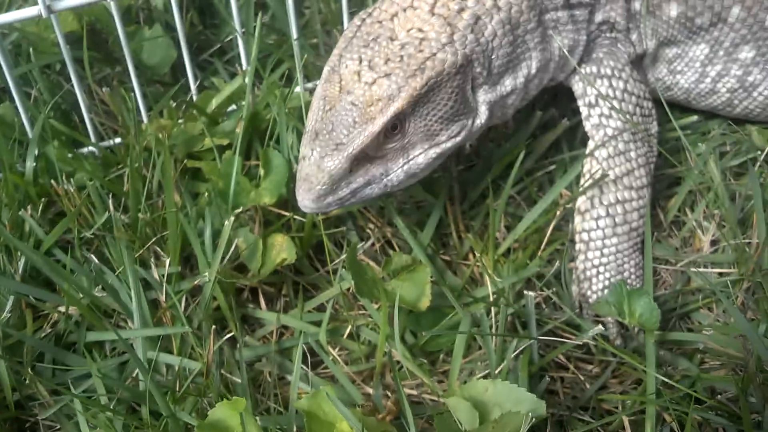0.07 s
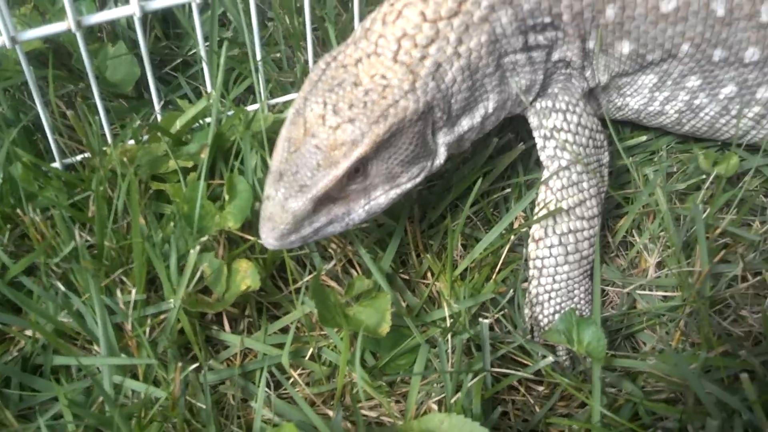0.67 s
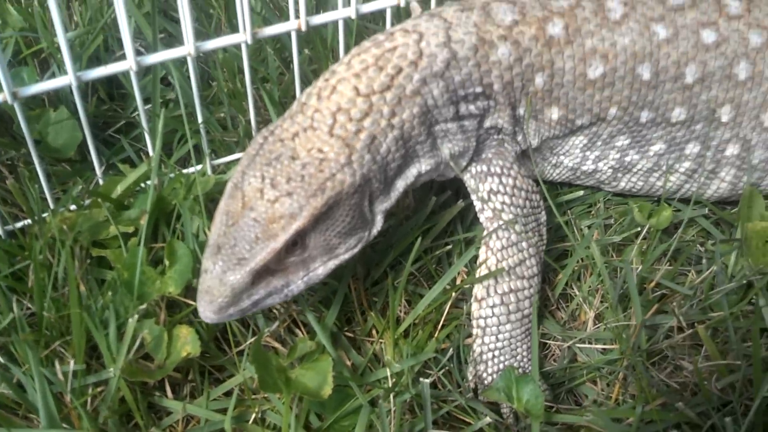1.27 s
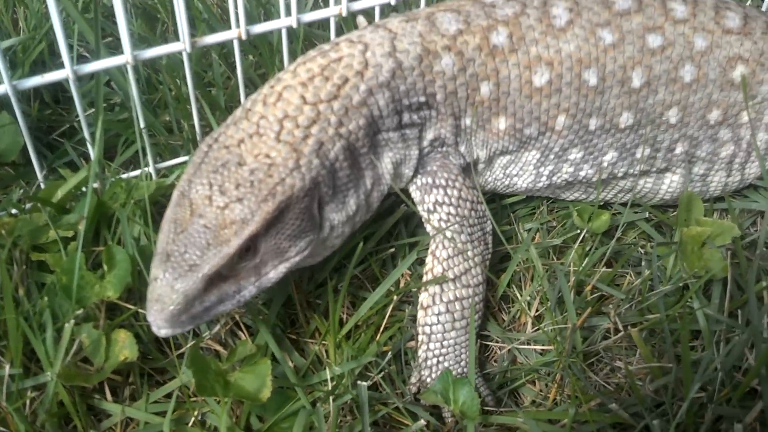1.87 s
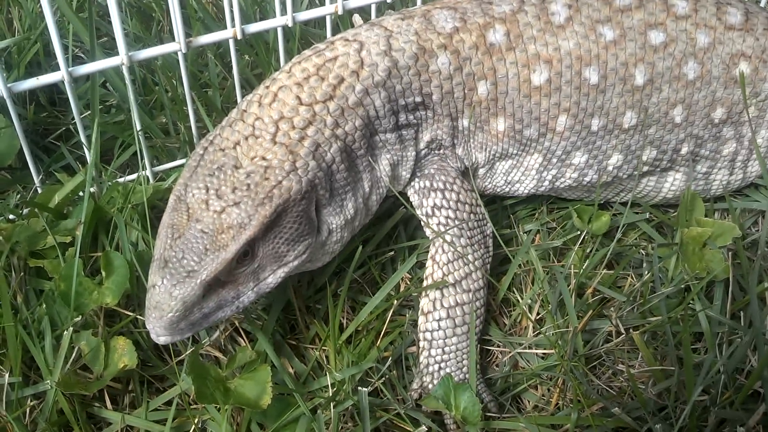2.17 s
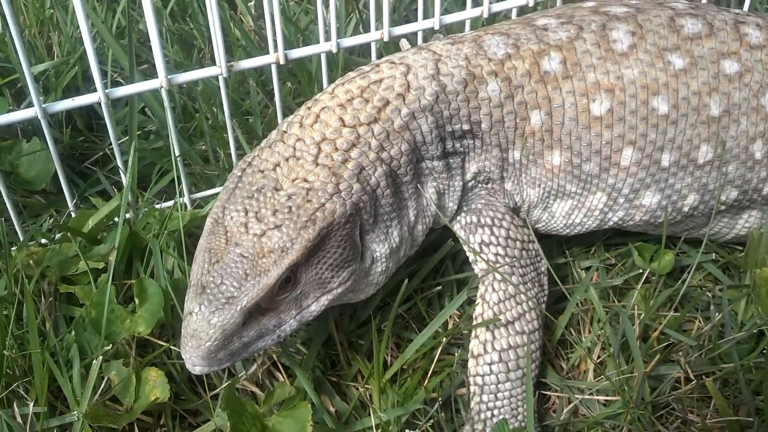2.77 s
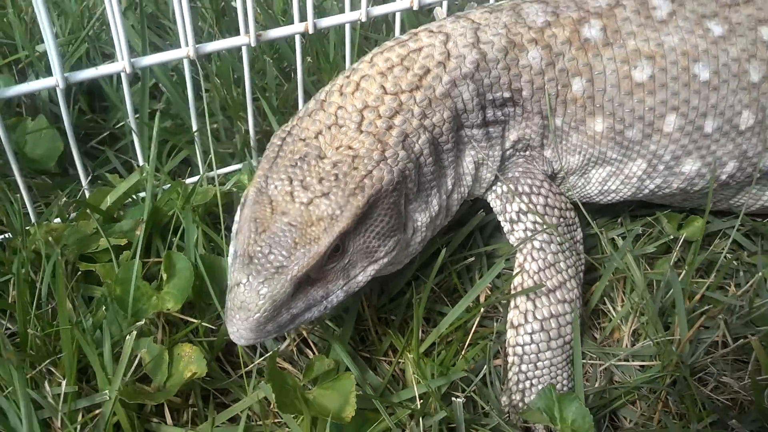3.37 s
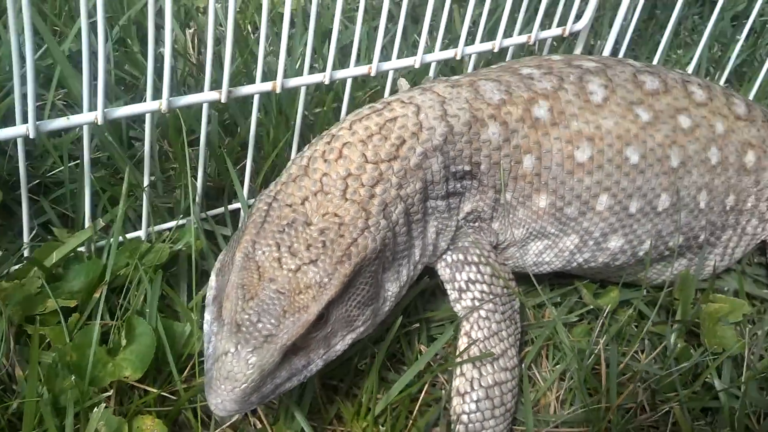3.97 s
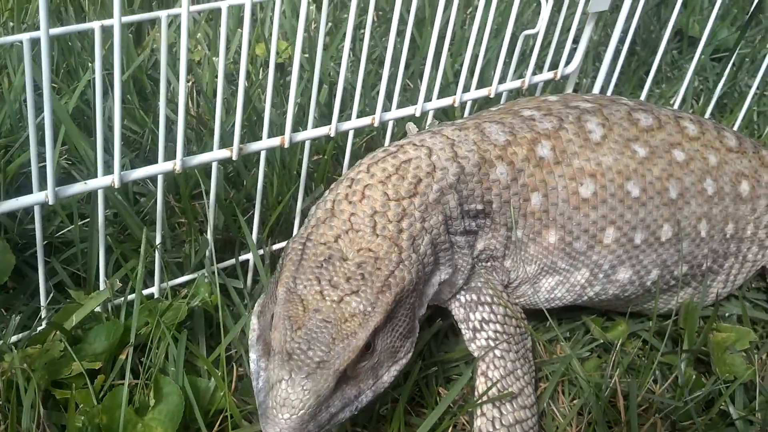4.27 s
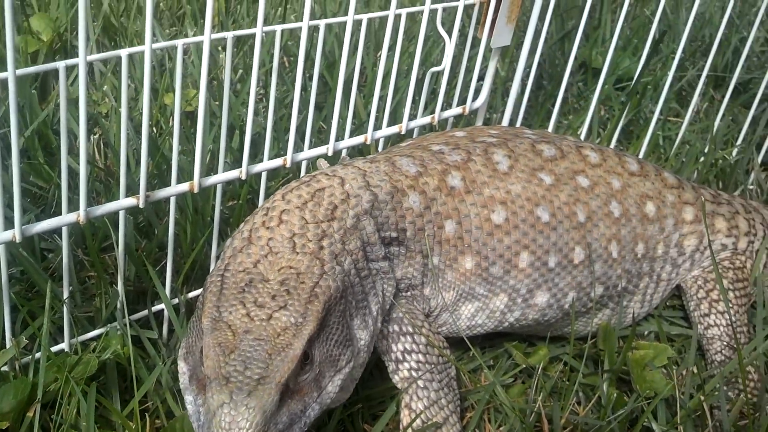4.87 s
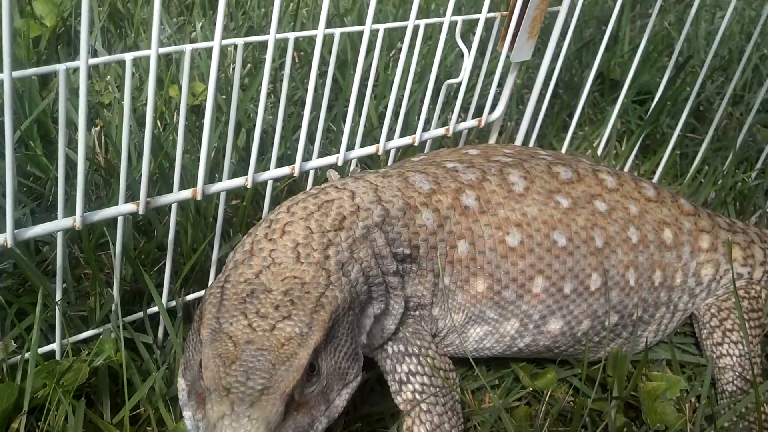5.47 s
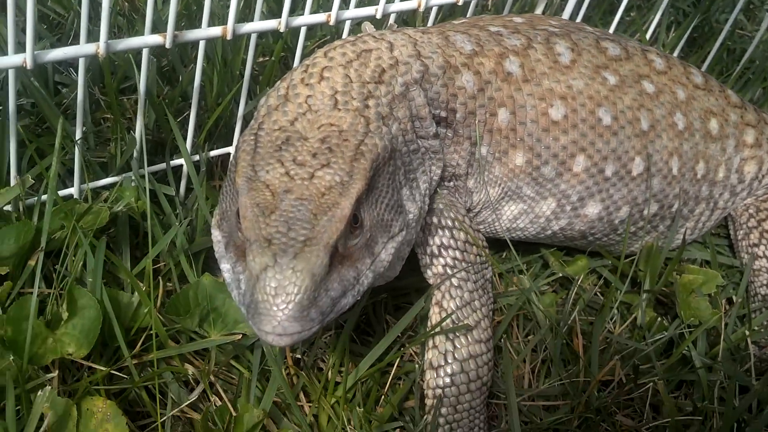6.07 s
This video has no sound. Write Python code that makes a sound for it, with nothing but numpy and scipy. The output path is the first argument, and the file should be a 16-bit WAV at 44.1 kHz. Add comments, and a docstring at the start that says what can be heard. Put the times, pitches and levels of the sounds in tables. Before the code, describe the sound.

On a lawn with a soft outdoor rumble and faint, shrill insects, a nearby lizard exhales a single throaty hiss that dies away. Fingers rub and knock on the handheld camera, with one loud, sharp click that briefly lowers everything else. Then a distant engine rises to a steady low drone while a cricket chirps evenly and another insect starts a pulsing rasp. Light handling knocks and tiny squeaks come close to the microphone.

```python
"""On a lawn, insects sing all round and a far engine picks up speed. A monitor lizard pushes out one long
hiss through its throat and mouth, fading as its lungs empty. Fingers scuff, squeak and knock on the
camera, and one sharp click makes its gain control (automatic volume) duck and creep back. The camera
widens its stereo picture by cross-feeding its two microphone ports, the openings that let sound in."""
import sys
import numpy as np
from scipy import signal
from scipy.fft import rfft, irfft, next_fast_len
from scipy.io import wavfile
from scipy.ndimage import uniform_filter1d, map_coordinates

SR = 44100
rng = np.random.default_rng(int(sys.argv[2]) if len(sys.argv) > 2 else 0)


def store_wav(level_fs):
    """Save 16-bit WAV to argv[1]."""
    pcm = np.round(np.clip(np.atleast_2d(level_fs), -1, 1) * 32767)
    wavfile.write(sys.argv[1], SR, pcm.T.astype(np.int16))


N = 269451


def amp(db):
    """Turn decibels into a number to multiply by."""
    return 10 ** (np.asarray(db) / 20)


def unit(x):
    """Scale x to an average strength (rms) of 1."""
    return x / np.sqrt(np.mean(x ** 2) + 1e-20)


def clock():
    """The time of every sample, in seconds."""
    return np.arange(N) / SR


def curves(rows):
    """Join rows of (time, values...) with straight lines: one curve for each value column."""
    times, *columns = np.transpose(rows)
    return [np.interp(clock(), times, column) for column in columns]


def wobble(rate):
    """A smooth curve through `rate` random values a second."""
    return map_coordinates(rng.standard_normal(int(N * rate / SR) + 4), [clock() * rate])


def filtered(x, response):
    """Multiply each frequency in x by response(hz)."""
    n = x.shape[-1]
    padded = next_fast_len(n + 4096)
    return irfft(rfft(x, padded) * response(np.fft.rfftfreq(padded, 1 / SR)), padded)[..., :n]


def colour(points):
    """A filter response drawn through points of f/Hz, level/dB."""
    freqs, db = np.transpose(points)
    return lambda hz: amp(np.interp(np.log(hz + 1), np.log(freqs), db))


def bell(centre_hz, width_hz):
    """A filter response that favours one pitch and falls away on both sides."""
    return lambda hz: 1 / (1 + ((hz - centre_hz) / width_hz) ** 2 * 2)


def panned(x, pan_db):
    """x at the two ports, the left one pan_db louder."""
    return x * amp([[pan_db / 2], [-pan_db / 2]])


def rush(response, side_db, pan_db):
    """Filtered stereo noise of strength 1; side_db sets the part that the ports do not share."""
    mid, side = filtered(rng.standard_normal((2, N)), response)
    side = side * amp(side_db)
    return unit(panned(np.array([mid + side, mid - side]), pan_db))


def swell(middle_s, length_s):
    """A smooth rise and fall of height 1."""
    return np.exp(-2 * np.minimum(((clock() - middle_s) / length_s) ** 2, 20))


def add(track, start_s, sound):
    """Mix a stereo sound into the track at start_s."""
    part = track[:, round(start_s * SR):][:, :sound.shape[1]]
    part += sound[:, :part.shape[1]]


def garden(chorus_db=-50):
    """Low outdoor rumble, airy hiss and the steady shrill of many insects."""
    # how loud the background is: t/s, rumble level/dB, air level/dB
    levels = [(0, -46, -49.5), (2.2, -51, -48.5), (3.1, -49.5, -47), (4.2, -49, -48.5), (6.11, -50, -51)]
    # tone of the rumble and of the airy hiss: f/Hz, level/dB
    rumble_tone = [(25, -67), (60, -24), (90, -7.5), (150, 2.5), (205, -4), (238, -1), (275, -5),
                   (330, -7.5), (550, -9.5), (900, -15.5), (1500, -23), (2500, -42)]
    air_tone = [(500, -8), (1500, 3), (2500, -0.5), (3500, -0.5), (4400, 5), (5100, -6.5), (7200, 8),
                (8000, 1.5), (9500, 2), (11000, -11), (13500, -5.5), (15800, -6)]
    # pitches that the crowd of insects sings on: f/Hz, width/Hz, level/dB
    chorus_bands = [(4380, 900, -6), (5830, 120, -1), (6240, 140, -2.5), (6804, 106, 1.5), (7100, 40, 4)]
    rumble_db, air_db = curves(levels)
    rumble = amp(rumble_db + wobble(5.9)) * rush(colour(rumble_tone), side_db=-2, pan_db=-4)
    air = amp(air_db + 0.36 * wobble(4.89)) * rush(colour(air_tone), side_db=2, pan_db=-0.5)
    shrill = lambda hz: sum(amp(db) * bell(centre, width)(hz) for centre, width, db in chorus_bands)
    chorus = amp(chorus_db + 0.15 * wobble(12)) * rush(shrill, side_db=1, pan_db=-6)
    return rumble + air + chorus


def hums(waver_db=2.0, waver_rad=0.88):
    """Two low hums waver in the distance."""
    # the faint hums: f/Hz, level/dB
    pitches = [(145.6, -64.5), (259, -66)]
    tone = np.zeros(N)
    for hz, db in pitches:
        strength = amp(db + waver_db * wobble(2.9))
        tone += strength * np.sin(2 * np.pi * hz * clock() + waver_rad * wobble(8))
    return panned(np.sqrt(2) * tone, pan_db=-5)


def engine(port_lag_rad=0.96, blur_rad=0.14, blur_rate=24, fade_db=1.2):
    """A far exhaust: each of its tones wavers on its way through the air; high ones blur to a drone."""
    # the engine picking up speed: t/s, firing rate/Hz, level/dB
    run = [(2.35, 89.4, -70), (2.62, 92.4, -60), (2.92, 97.7, -57.5), (3.05, 99.8, -46.5),
           (3.27, 107.1, -53.5), (3.41, 113.3, -46), (3.63, 116.2, -47), (3.77, 115.4, -45),
           (3.91, 109.3, -48), (4.03, 111.3, -44.7), (4.4, 114.6, -45.5), (4.65, 117.5, -48.5),
           (4.95, 117.4, -47.5), (5.19, 114.6, -44), (5.45, 115.9, -46.5), (5.75, 116.9, -49),
           (6.11, 115.3, -43.5)]
    # tones of the exhaust: multiple of the firing rate, level/dB
    exhaust = [(1, 0.5), (2, -24.5), (3, -19.5), (4, -17.5), (5, -20), (6, -26.5)]
    firing_hz, db = curves(run)
    phase = 2 * np.pi * np.cumsum(firing_hz * (1 + 0.004 * wobble(25))) / SR
    ports = np.array([[0], [port_lag_rad]])
    drone = np.zeros((2, N))
    for k, tone_db in exhaust:
        strength = amp(tone_db + min(k, 3) * fade_db * wobble(7))
        blur = (k - 1) * blur_rad * wobble(blur_rate)
        drone += strength * np.sin(k * phase + blur + ports)
    return panned(amp(db) * np.sqrt(2) * drone, pan_db=-6.5)


def beats(song):
    """The time and level of each call, repeating evenly within each stretch of a song."""
    ends = [s - period / 2 for s, period, db in song[1:]] + [N / SR]
    return [(s, db) for (first, period, db), end in zip(song, ends)
            for s in np.arange(first, end, period)]


def katydid(song, pitch_hz, far_db, pan_db, lisp_s=0.031, tooth_hz=126, fizz_db=-14, drift_hz=60):
    """Short high lisps over fainter far ones, buzzing as a row of wing teeth passes a scraper."""
    # overtones of a lisp: f/Hz, level/dB
    fizz_tone = [(5000, -36), (9000, 0), (11000, -38), (13500, 27), (15800, -8)]
    lisps = sum(amp(db) * swell(s, lisp_s) for s, db in beats(song))
    loudness = amp(far_db + 1.9 * wobble(19)) + amp(wobble(5)) * lisps
    pitch = pitch_hz + drift_hz * wobble(5.4)
    tooth_rate = tooth_hz * (1 + 0.0733 * wobble(12))
    teeth = 1 + 0.5 * np.sin(2 * np.pi * np.cumsum(tooth_rate) / SR)
    # low noise times a sine makes a narrow band of noise around the sine's pitch
    low_noise = rush(bell(0, width_hz=180), side_db=-0.5, pan_db=pan_db)
    wing = unit(low_noise * np.sin(2 * np.pi * np.cumsum(pitch) / SR))
    fizz = amp(fizz_db) * rush(colour(fizz_tone), side_db=-29, pan_db=-29)
    return loudness * unit(teeth) * (wing + fizz)


def katydids():
    """Two katydids (bush crickets) sing out of step, each on its own pitch."""
    # stretches of each song: first lisp t/s, time between lisps/s, level/dB
    high_song = [(0.11, 0.19, -58.5), (1.7, 0.19, -58), (3.04, 0.2137, -59.5), (4.73, 0.23, -59)]
    low_song = [(2.42, 0.16, -55), (3.03, 0.247, -61.5), (4.52, 0.24, -60)]
    return (katydid(high_song, pitch_hz=10090, far_db=-70.5, pan_db=-10.5)
            + katydid(low_song, pitch_hz=9980, far_db=-67.5, pan_db=-2))


def cricket(pitch_hz=4490, drift_hz=20, sag_hz_per_s=9000, period_s=0.0406, stroke_s=0.0138,
            rough_db=2, scratch_rad=1.17, stray_s=0.0044, stray_db=0.8):
    """A chirp is three scratchy wing strokes that tend to grow; each drops in pitch as the wing slows."""
    # the chirps: middle t/s, level/dB
    chirps = [(0.13, -51), (0.47, -56), (0.79, -50), (1.13, -49), (1.469, -53), (1.865, -52), (2.22, -49.5),
              (2.58, -46.5), (2.97, -50), (3.4, -50), (3.83, -49.5), (4.19, -48.5), (4.529, -46),
              (4.9, -49), (5.25, -47.5), (5.58, -46.5), (5.912, -49)]
    strokes = np.zeros(N)
    hz = pitch_hz + drift_hz * wobble(2.3)
    for s, db in chirps:
        for k, step_db in enumerate([-1.5, -0.3, 0.3]):
            early, strength = rng.standard_normal(2)
            middle = s + (k - 1) * period_s - stray_s * early
            strokes += amp(db + step_db + stray_db * strength) * swell(middle, stroke_s)
            since = clock() - middle
            hz -= sag_hz_per_s * since * (np.abs(since) < period_s / 2)
    scratch = scratch_rad * np.array([wobble(420), wobble(420)])
    wing = panned(np.sin(2 * np.pi * np.cumsum(hz) / SR + scratch), pan_db=-4)
    return strokes * unit(amp(rough_db * wobble(250)) * wing)


def rasping_insect(level_db=-47.5, half_up_s=3.98, rise_s=0.5, stroke_hz=10, stroke_s=0.005, buzz=0.7):
    """An insect works up to a rasp of short strokes of uneven strength over a steadier buzz."""
    # tone of the rasp: f/Hz, level/dB
    rasp_tone = [(2500, -27), (3400, 3.5), (4000, -5), (5000, 1), (5800, 4), (7000, -6.5), (8500, -36),
                 (12000, -46)]
    effort = (1 + np.tanh((clock() - half_up_s) / rise_s / 2)) / 2
    cycles = clock() * stroke_hz + 0.21 * wobble(5.2)  # slightly uneven timing
    from_stroke_s = np.abs(cycles % 1 - 0.5) / stroke_hz
    strokes = buzz + amp(2.5 * wobble(17)) * np.exp(-from_stroke_s / stroke_s)
    loudness = effort * amp(level_db + 0.23 * wobble(9))
    return loudness * unit(strokes) * rush(colour(rasp_tone), side_db=-1.5, pan_db=0.5)


def scuffs(grain_db=4, width_hz=170, catches_per_s=700):
    """Skin slips over the camera's case in tiny catches; each slide favours one pitch."""
    # finger slides: middle t/s, half length/s, level/dB, main f/Hz, share of broad noise
    slides = [(1.068, 0.13, -47.5, 1080, 0.27), (1.437, 0.037, -45.5, 1430, 0.35),
              (1.839, 0.048, -54.5, 1370, 0.15), (2.685, 0.083, -51.5, 1630, 0.8),
              (2.772, 0.065, -45, 1540, 1), (3.683, 0.35, -57, 925, 0.25), (3.96, 0.015, -40.5, 1547, 0.46),
              (3.99, 0.046, -50.5, 940, 0.35), (4.301, 0.21, -58.5, 1069, 0.29),
              (5.488, 0.094, -53, 1210, 0.11)]
    # tone of skin rubbing the case: f/Hz, level/dB
    rub_tone = [(40, -53), (200, 0), (500, 5), (1050, -5.5), (1500, -7.5), (2000, 1.5), (2800, -7.5),
                (8000, -11.5), (15000, -39)]
    track = np.zeros((2, N))
    for s, half_s, db, main_hz, broad_share in slides:
        t = np.arange(round(half_s * SR * 2)) / SR
        tone = lambda hz: colour(rub_tone)(hz) * (broad_share + bell(main_hz, width_hz)(hz))
        mid, side = filtered(rng.standard_normal((2, SR)), tone)[:, :len(t)]
        rub = np.array([mid + side / 2, mid - side / 2])
        catches = map_coordinates(rng.standard_normal(1000), [t * catches_per_s], order=1)
        slide = unit(amp(grain_db * catches) * rub) * np.hanning(len(t)) ** 2
        add(track, s - half_s, panned(amp(db) * slide, pan_db=-14))
    return track


def squeaks(unsteady=0.053, octave_db=-14, port_lag_rad=0.96):
    """Skin sticks and slips evenly on the case: a tiny swelling ring with a weak octave above it."""
    # fingertip squeaks: middle t/s, length/s, level/dB, f/Hz, left minus right/dB
    slips = [(3.3812, 0.0043, -30.5, 994, 7), (3.507, 0.0048, -32, 874, 3.5),
             (3.9556, 0.003, -30.5, 1020, 9)]
    track = np.zeros((2, N))
    ports = np.array([[0], [port_lag_rad]])
    t = np.arange(SR // 25) / SR - 1 / 50  # zero at the middle of the squeak
    for s, length_s, db, hz, pan_db in slips:
        waver = map_coordinates(rng.standard_normal(16), [np.linspace(0, 15, len(t))])
        phase = 2 * np.pi * np.cumsum(hz * (1 + unsteady * waver)) / SR + ports
        tone = np.sin(phase) + amp(octave_db) * np.sin(2 * phase)
        ring = tone * np.exp(-2 * (t / length_s) ** 2)
        add(track, s + t[0], panned(amp(db) * ring, pan_db))
    return track


def case_ring(t, main_hz, focus_db_per_octave=5, case_db=-10, spot_ring_s=0.0048, give_s=0.00075,
              port_rad=-1.185, apart_hz=1100):
    """The touched spot gives one quickly fading pitch and wakes the case's own pitches near it."""
    # pitches that the case rings at: f/Hz, level/dB, time to fade by 60 dB/s
    case_modes = [(240, -40, .012), (400, -22, 0.0093), (636, 4, 0.011), (958, -4, 0.022),
                  (1567, 5, 0.0081), (1874, -2, 0.016), (1930, -2.5, 0.013)]

    def mode(hz, ring_s):
        """One fading wave bends the case and reaches the ports out of step, less so if it is low."""
        offset = min(hz / apart_hz, 1) * np.array([[port_rad], [-port_rad]])
        return amp(-60 * t / ring_s) * np.sin(2 * np.pi * hz * t + offset)

    case = sum(amp(case_db + db - focus_db_per_octave * abs(np.log2(hz / main_hz))) * mode(hz, ring_s)
               for hz, db, ring_s in case_modes)
    return (mode(main_hz, spot_ring_s) + case) * (1 - np.exp(-t / give_s))


def small_case(x, lowest_hz=210):
    """The case is too small to give off deep bass."""
    return signal.lfilter(*signal.butter(3, lowest_hz, "highpass", fs=SR), x)


def crack(t, tilt_db, life_s=0.000513, tilt_from_hz=1500):
    """The crack of a contact: a split-second burst that holds every frequency."""
    # tone of the crack: f/Hz, level/dB
    crack_tone = [(70, -45), (250, -7), (800, 11.5), (2000, -0.5), (4000, 0.5), (6700, 0), (10000, -11),
                  (13000, -9.5), (15800, -6.5)]
    snap = t / life_s * 2 * np.exp(1 - t / life_s * 2)
    spectrum = rfft(rng.standard_normal((2, len(t))) * snap, 2 * len(t))
    burst = irfft(spectrum / (np.abs(spectrum) + 1e-9))[:, :len(t)]  # all frequencies made equal
    tone = lambda hz: colour(crack_tone)(hz) * amp(tilt_db * np.log2(np.maximum(hz / tilt_from_hz, 1)))
    return unit(small_case(filtered(burst, tone))) * np.sqrt(np.mean(snap ** 2))


def contacts(hard_top_hz=5960, hard_chatter_s=0.000069, soft_crack_db=-3.5, soft_tilt_db=-2):
    """List every hit on the case: hard clicks barely chatter; soft knocks have a weak, dull crack."""
    # sharp clicks: t/s, ring level/dB, crack level/dB, crack tilt/dB per octave, main f/Hz,
    # left minus right/dB
    clicks = [(1.4967, -11, -4, 0.5, 1580, -3.5), (1.5032, -7.5, -6, -5.5, 820, -1),
              (3.35, -47, -17, 2, 960, 0), (5.352, -39, -20, 0.5, 1360, 1)]
    # soft fingertip knocks: t/s, level/dB, main f/Hz, top f/Hz, chatter/s, left minus right/dB
    taps = [(1.4269, -28.5, 680, 2000, 0.005, -3), (1.433, -26.5, 1010, 1800, 0.0062, -3),
            (1.4403, -31.5, 620, 1100, 0.002, -6), (1.4561, -26, 623, 1700, 0.0008, -6),
            (1.5135, -28, 800, 1100, 0.001, -7), (1.5422, -24.5, 597, 1190, 0.00009, -1),
            (3.1336, -33.5, 1010, 1410, 0.0001, 7), (3.2786, -24.5, 601, 1287, 0.00011, 4),
            (3.3773, -27, 383, 514, 0.0001, 15), (3.382, -32.5, 1500, 2400, 0.003, -4),
            (3.5057, -30.5, 857, 2383, 0.004, 3), (3.565, -34, 615, 1010, 0.0014, 2),
            (3.64, -29.5, 990, 1900, 0.0001, 4), (3.702, -34, 949, 2000, 0.0025, -7),
            (3.9523, -27.5, 460, 800, 0.0001, -2), (3.9522, -23.5, 1290, 2390, 0.0066, 8.5),
            (4.426, -32.5, 563, 1200, 0.0003, -1), (5.8138, -26.5, 850.3, 1137, 0.00011, 11)]
    hard = [(s, db, crack_db, tilt_db, hz, hard_top_hz, hard_chatter_s, pan_db)
            for s, db, crack_db, tilt_db, hz, pan_db in clicks]
    soft = [(s, db, db + soft_crack_db, soft_tilt_db, hz, top_hz, chatter_s, pan_db)
            for s, db, hz, top_hz, chatter_s, pan_db in taps]
    return hard + soft


def knocks(chatter_share=0.18, ring_trim_db=-1, crack_trim_db=-7):
    """A fingertip pushes and chatters on the case, making it ring and crack."""
    track = np.zeros((2, N))
    t = np.arange(SR // 16) / SR
    for s, ring_db, crack_db, tilt_db, main_hz, top_hz, chatter_s, pan_db in contacts():
        force = chatter_share * rng.standard_normal((2, len(t))) * np.exp(-(t / chatter_s) ** 2)
        force[:, 0] += 1  # the push itself
        force = signal.lfilter(*signal.butter(4, top_hz, fs=SR), force)  # a softer tip is duller
        ring = small_case(signal.fftconvolve(force, case_ring(t, main_hz), axes=1)[:, :len(t)])
        ring /= np.abs(ring).max(axis=1, keepdims=True)
        sound = amp(ring_db + ring_trim_db) * ring + amp(crack_db + crack_trim_db) * crack(t, tilt_db)
        add(track, s, panned(sound, pan_db))
    return track


def lizard(breath_db=-34.5, empty_s=1.55, taper=1.7, mouth_db=-4.5, mouth_growth=0.78,
           wander=0.0346, sag_per_s=0.06, sizzle_db=-14, sizzle_s=0.72):
    """One fading breath drives a fluttering rush in the throat and a smoother hiss at the mouth."""
    # tone of the throat, the mouth and the sizzle of the first push: f/Hz, level/dB
    throat_tone = [(60, -58), (110, -29), (170, -10), (220, 0.5), (310, -11), (400, -4), (580, -8),
                   (800, -21), (1200, -29), (2500, -52)]
    mouth_tone = [(300, -25), (900, -5), (1500, -1.5), (2200, 3), (3200, 2.5), (4000, -3.5), (4800, 2.5),
                  (6000, 2), (7000, 6), (7700, -9), (10000, -2), (11500, -11.5), (13500, -6), (15800, -9)]
    sizzle_tone = [(6000, -30), (11000, -10), (13000, -3), (15000, 0), (15800, -8)]
    flow_db = taper * 20 * np.log10(np.maximum(1 - (clock() / empty_s) ** 2, 1e-4))
    # the throat's pitches wander and sink as it slackens: reading its noise slower lowers them
    speed = 1 + wander * wobble(7) - sag_per_s * (np.minimum(clock(), empty_s) - empty_s / 4)
    throat_noise = rush(colour(throat_tone), side_db=-20, pan_db=6)
    sinking = np.array([map_coordinates(port, [np.cumsum(speed)], order=1, mode="wrap")
                        for port in throat_noise])
    throat = amp(flow_db + 0.99 * wobble(23)) * sinking
    hiss_db = mouth_db + mouth_growth * flow_db + 0.6 * wobble(15.9)
    mouth = amp(hiss_db) * rush(colour(mouth_tone), side_db=1, pan_db=3.5)
    sizzle = amp(sizzle_db) * swell(0, sizzle_s) * rush(colour(sizzle_tone), side_db=-1, pan_db=2)
    return amp(breath_db) * (throat + mouth + sizzle)


def scene():
    """Everything that reaches the two ports."""
    return (lizard() + garden() + hums() + engine() + cricket() + katydids() + rasping_insect()
            + knocks() + squeaks() + scuffs())


def widen(x, corner_hz=700, delay_s=16 / 44100):
    """Above the bass, each channel has the other port subtracted a moment later."""
    feed = lambda hz: 1 - np.exp(-(hz / corner_hz) ** 2)
    crossed = filtered(x[::-1], lambda hz: feed(hz) * np.exp(-2j * np.pi * hz * delay_s))
    return filtered(x - crossed, lambda hz: 1 / np.sqrt(1 + feed(hz) ** 2))


def gain_control(x, threshold_db=-27.5, attack_s=0.0097, release_db_per_s=8.5):
    """A loud peak slips through, then the volume drops by its excess and creeps back."""
    power = uniform_filter1d(np.mean(x ** 2, 0), size=128)
    excess_db = np.maximum(10 * np.log10(np.abs(power) + 1e-12) - threshold_db, 0)
    ramp = release_db_per_s * clock()
    cut_db = np.maximum.accumulate(excess_db + ramp) - ramp  # hold each cut and let it go steadily
    pole = np.exp(-1 / (attack_s * SR))
    for _ in range(2):  # smoothing makes the cut arrive a little late
        cut_db = signal.lfilter([1 - pole], [1, -pole], cut_db)
    return x * amp(-cut_db)


def record(dry, whine_db=-79, whine_hz=15734, top_hz=15850):
    """The camera widens the sound, adds a thin electronic whine, ducks peaks and cuts the top treble."""
    whine = amp(whine_db) * np.sqrt(2) * np.sin(2 * np.pi * whine_hz * clock())
    return filtered(gain_control(widen(dry) + whine), lambda hz: hz < top_hz)


dry = scene()
out = record(dry)
store_wav(out)
```